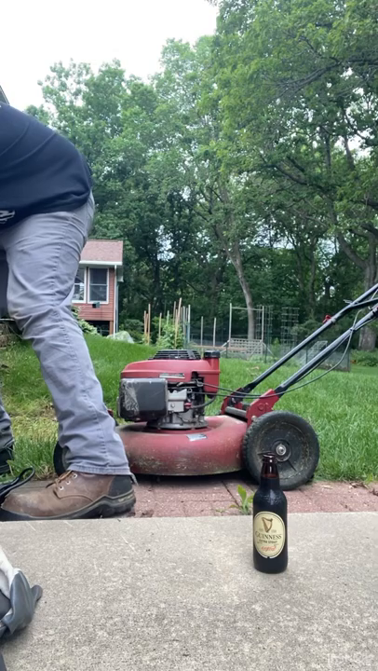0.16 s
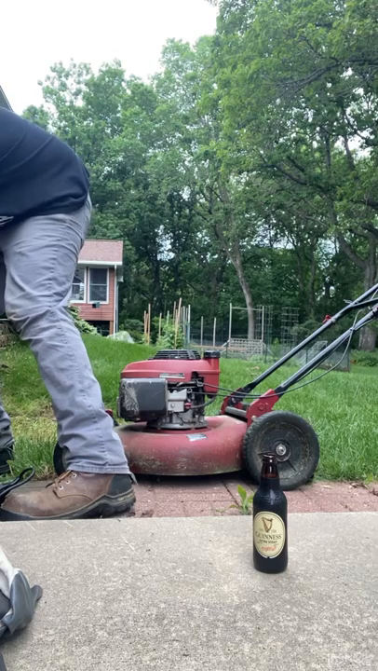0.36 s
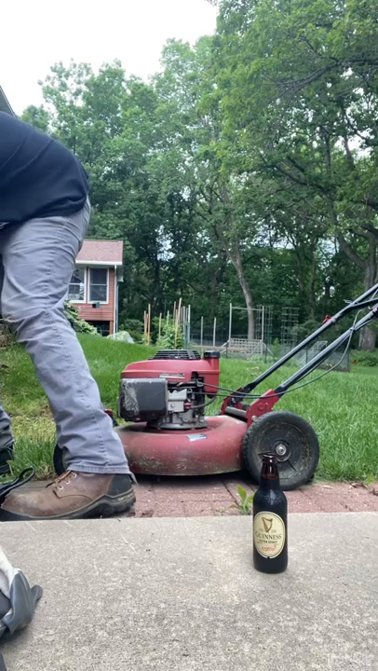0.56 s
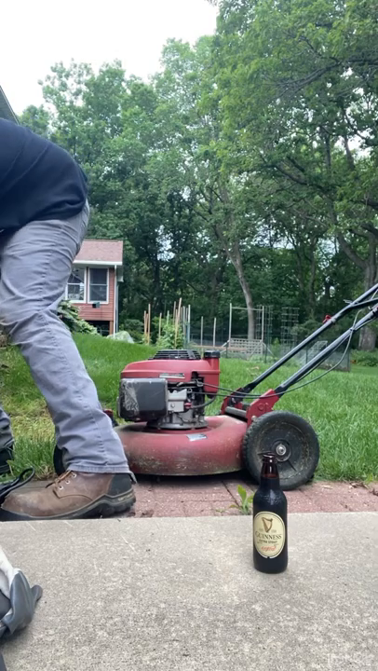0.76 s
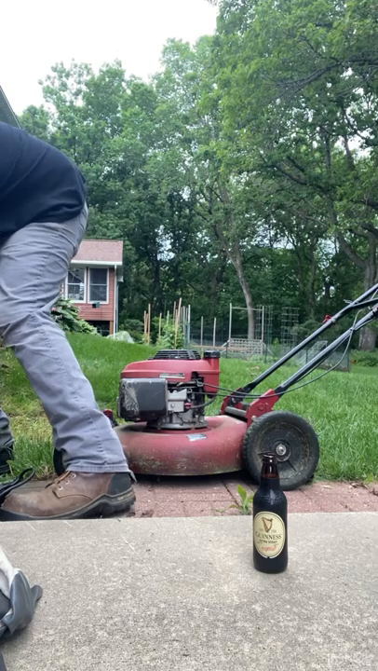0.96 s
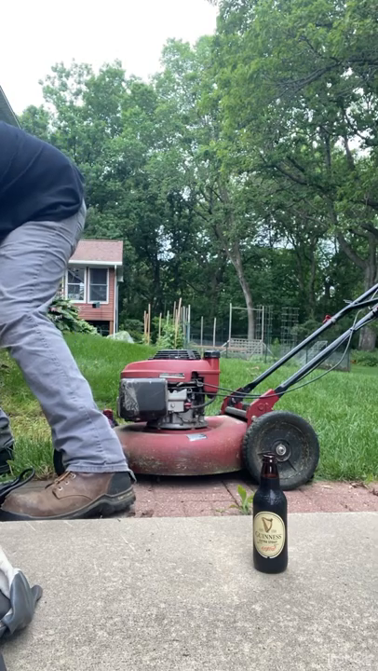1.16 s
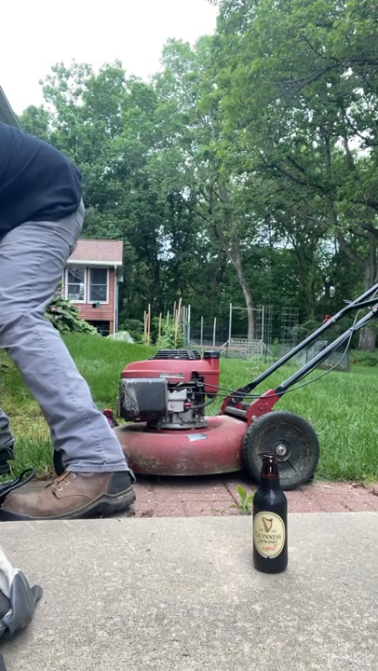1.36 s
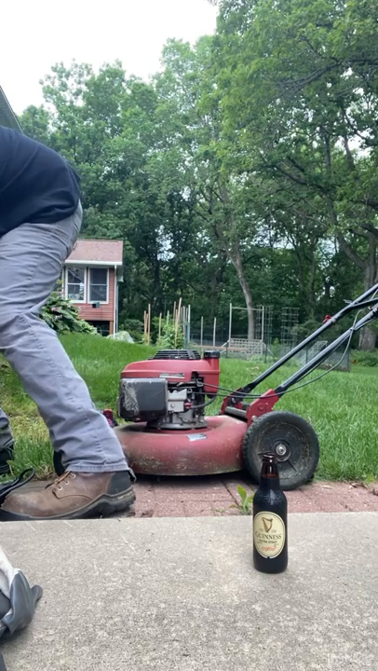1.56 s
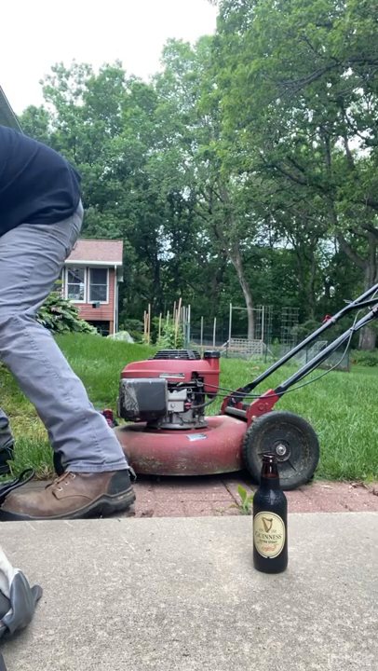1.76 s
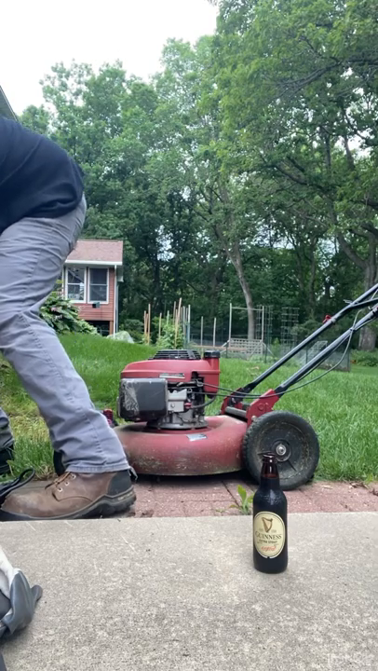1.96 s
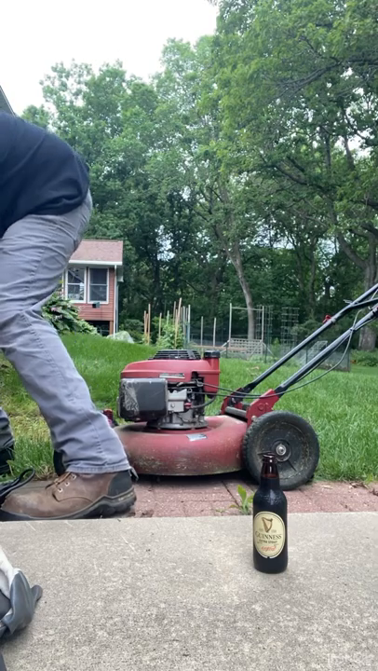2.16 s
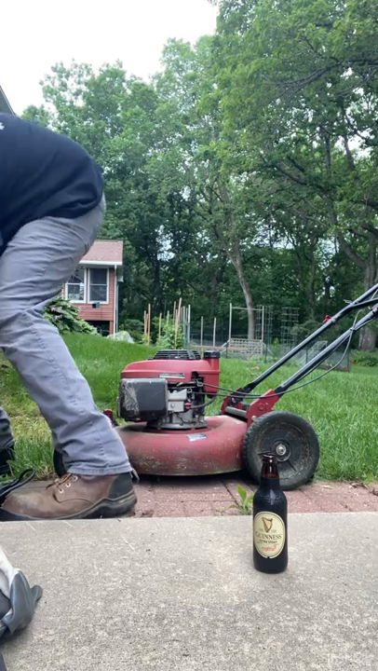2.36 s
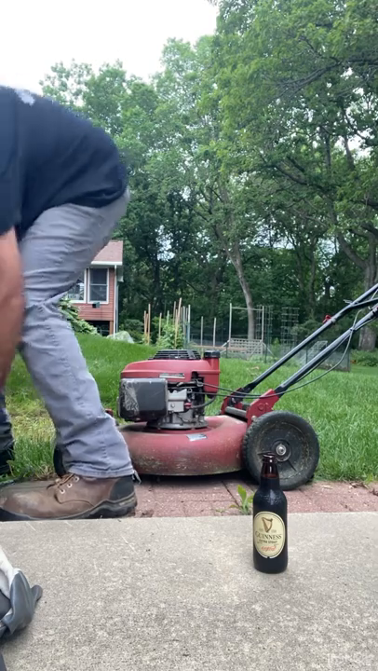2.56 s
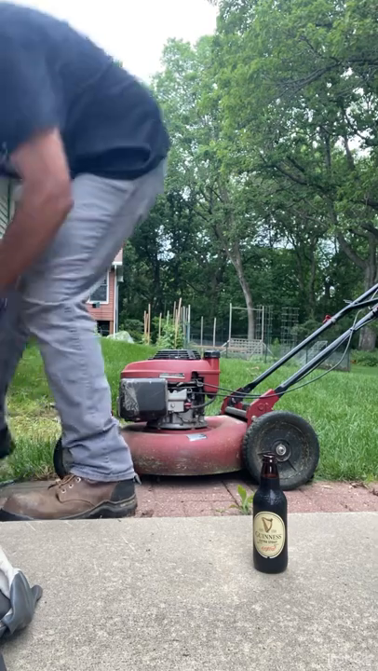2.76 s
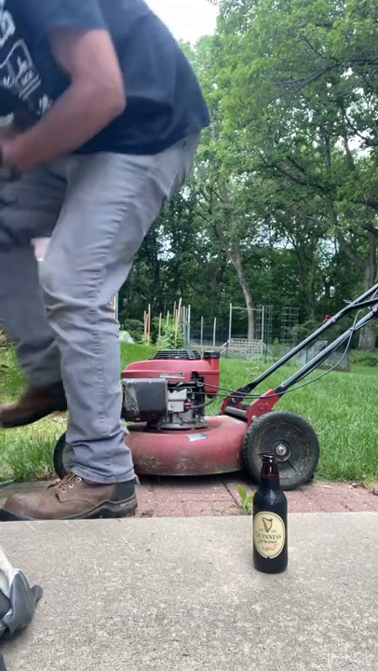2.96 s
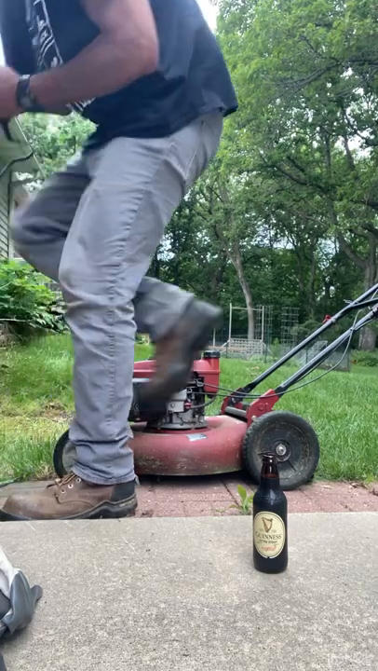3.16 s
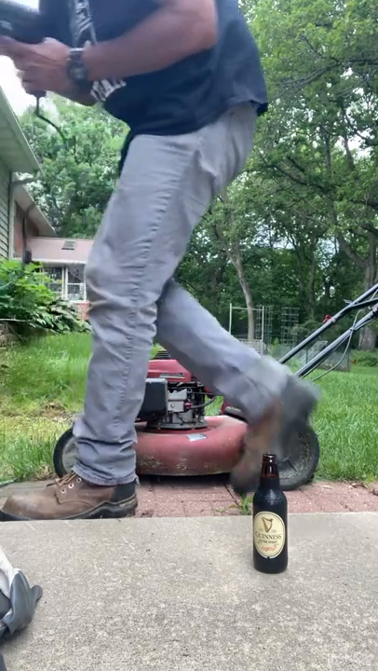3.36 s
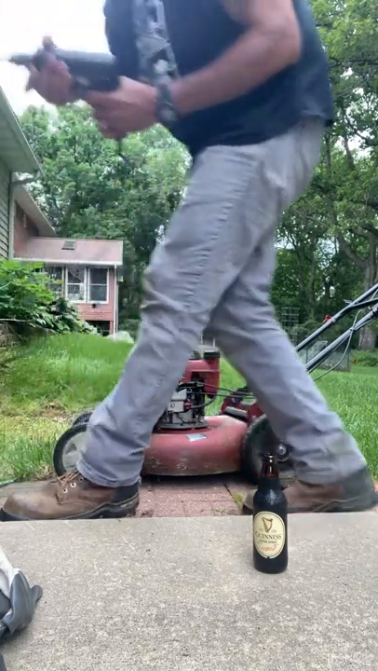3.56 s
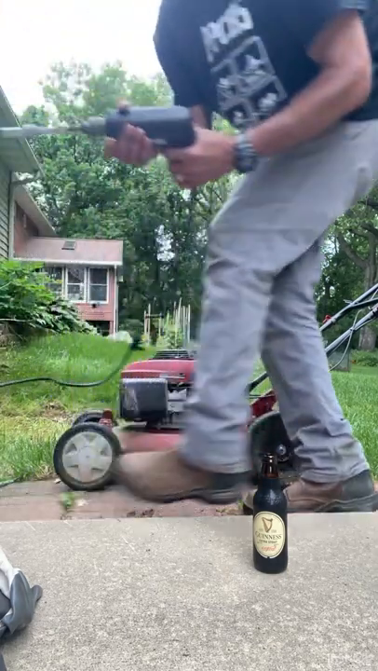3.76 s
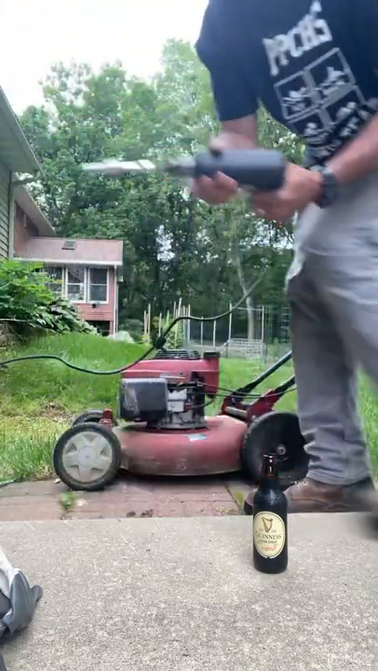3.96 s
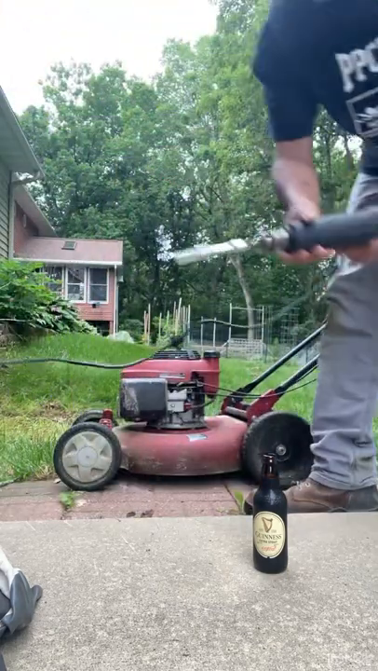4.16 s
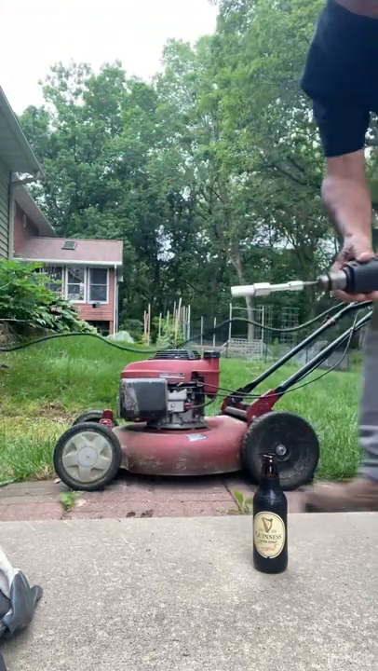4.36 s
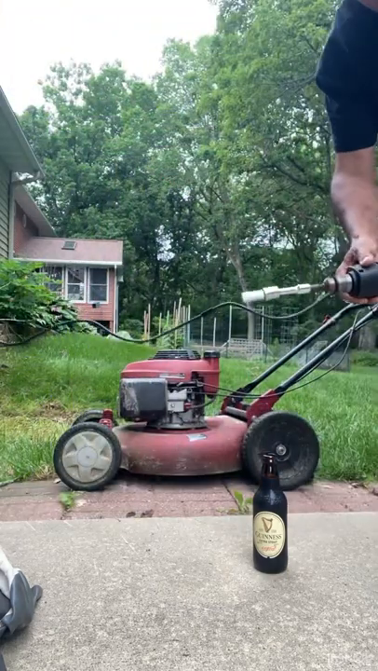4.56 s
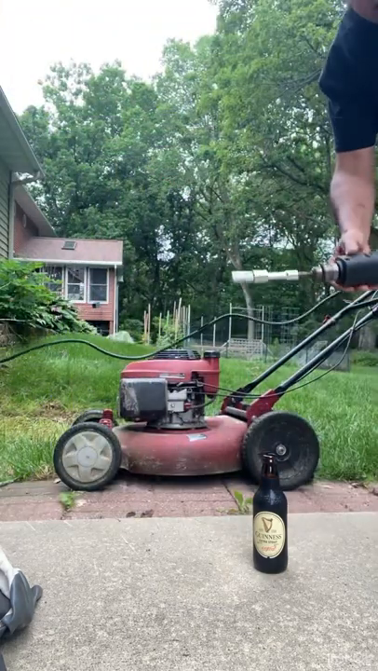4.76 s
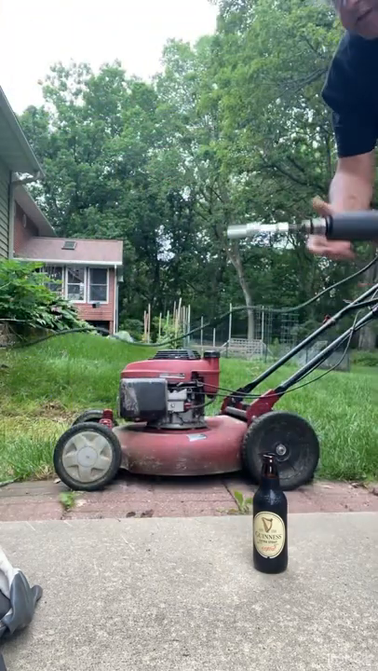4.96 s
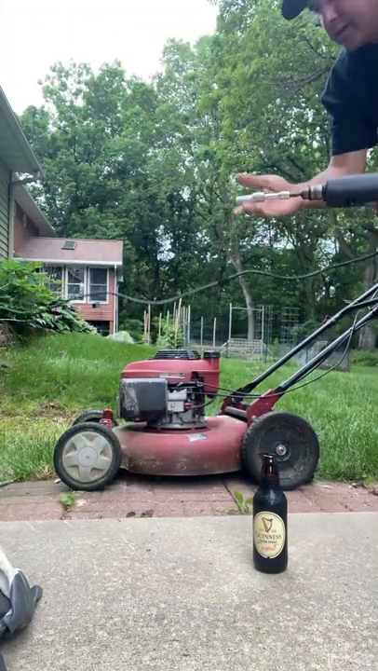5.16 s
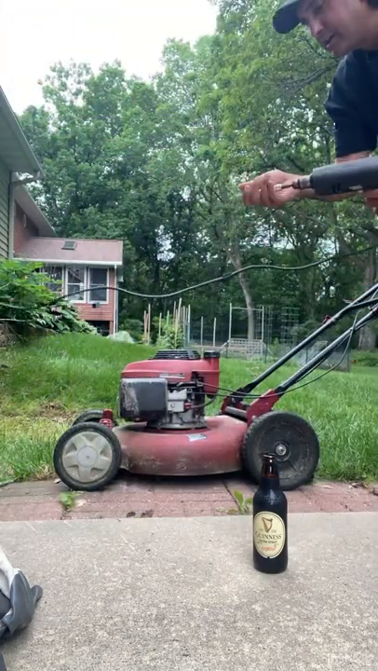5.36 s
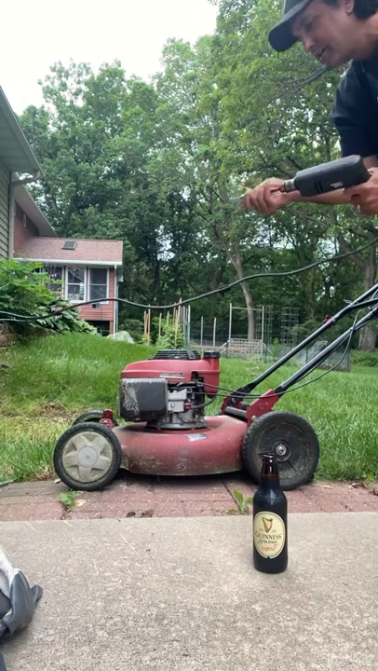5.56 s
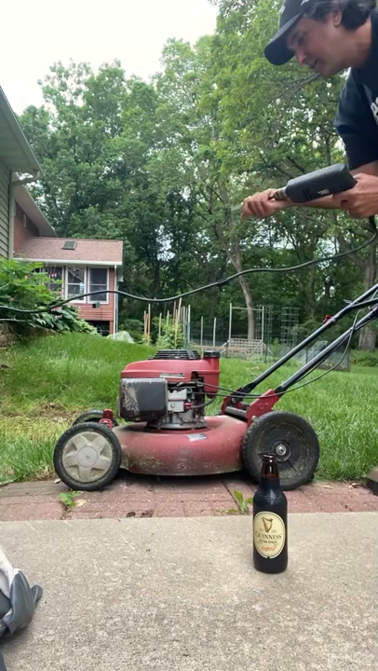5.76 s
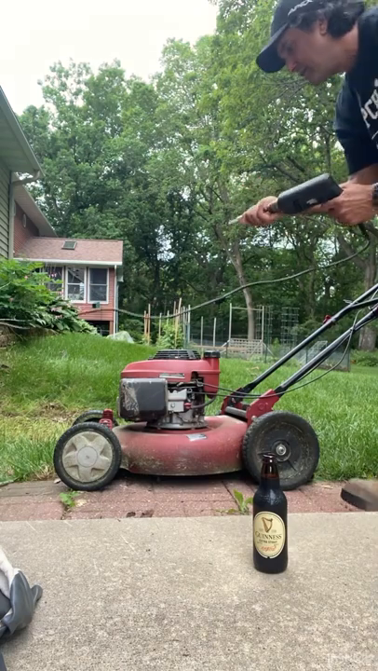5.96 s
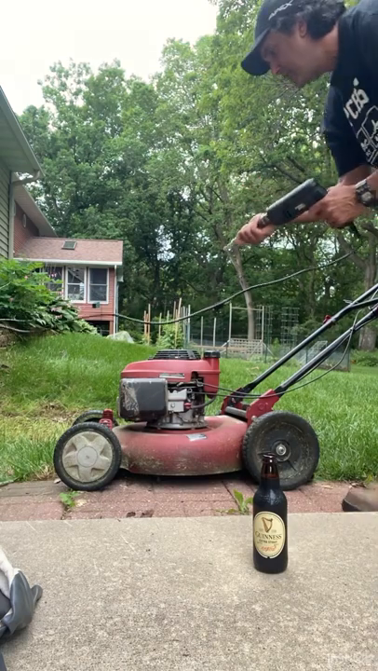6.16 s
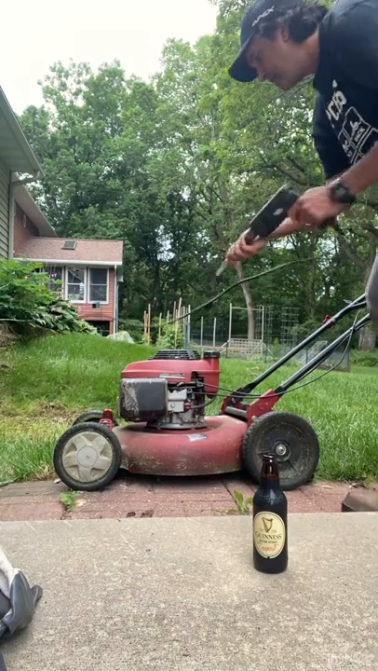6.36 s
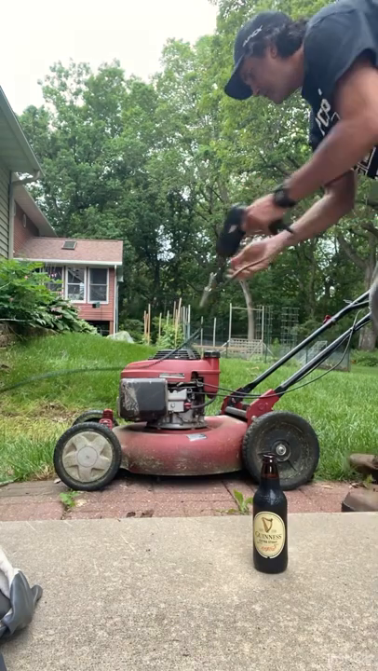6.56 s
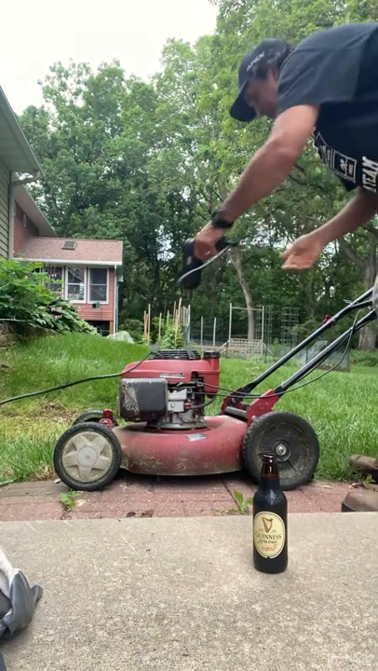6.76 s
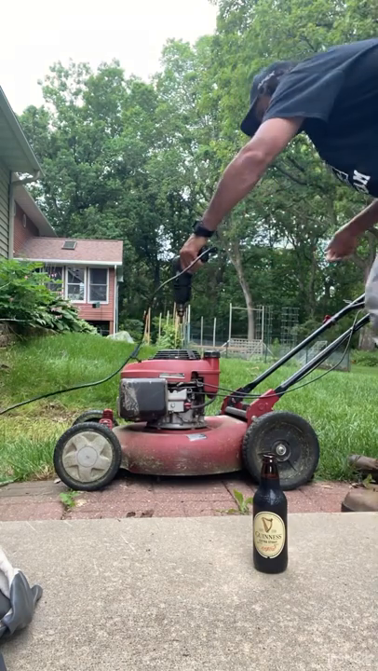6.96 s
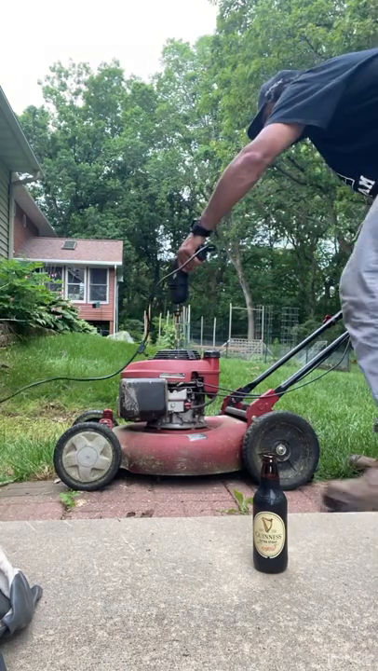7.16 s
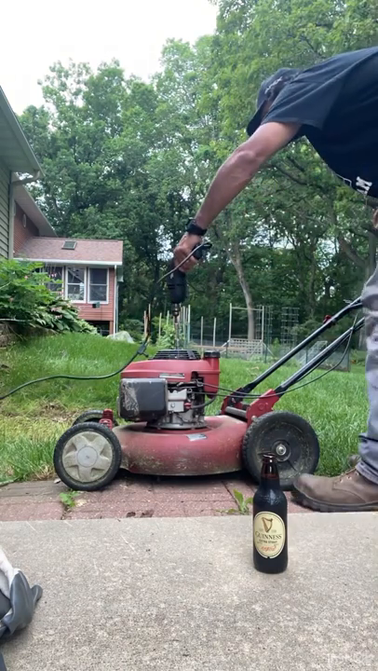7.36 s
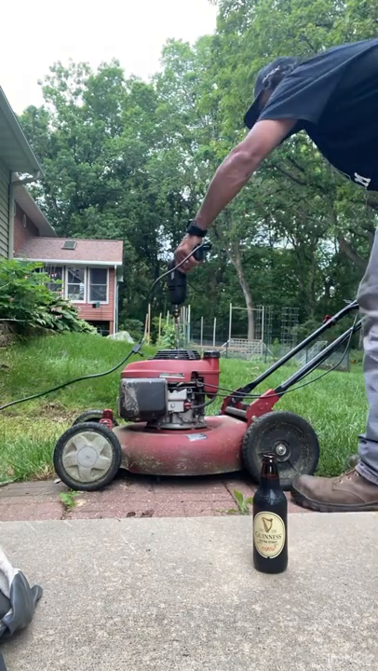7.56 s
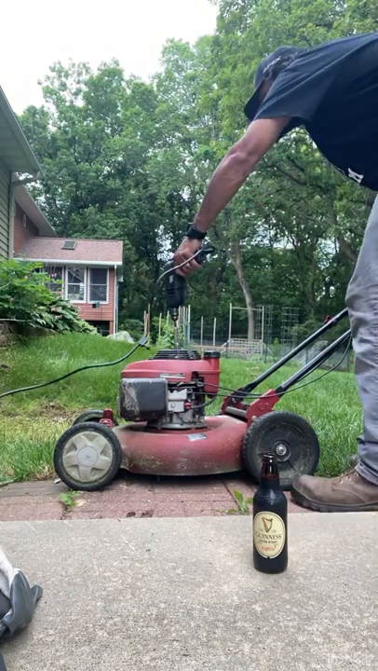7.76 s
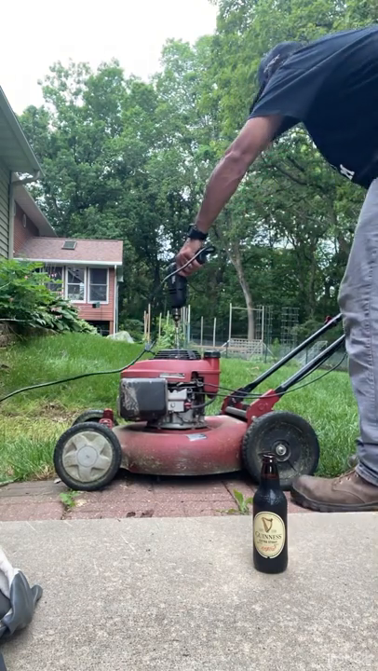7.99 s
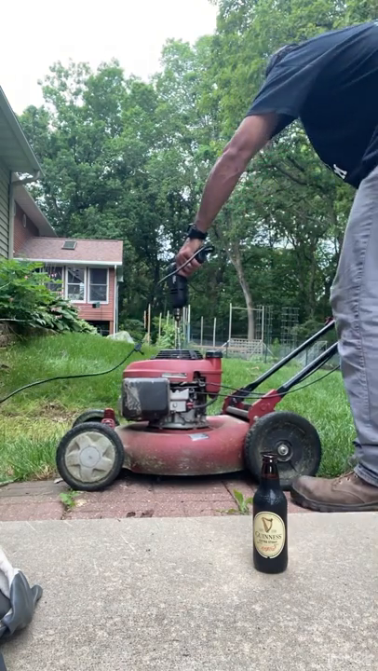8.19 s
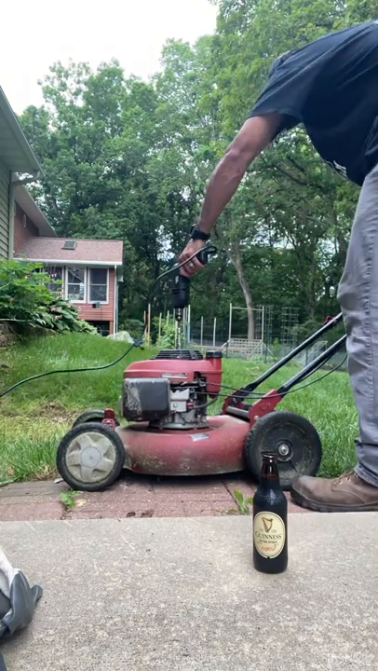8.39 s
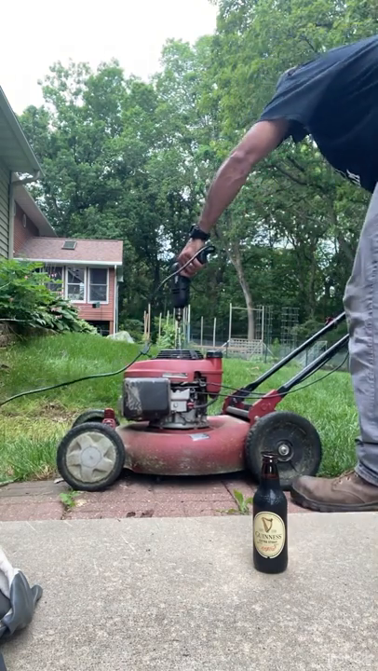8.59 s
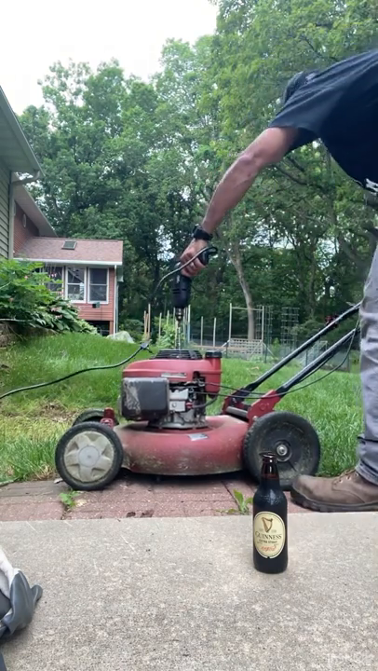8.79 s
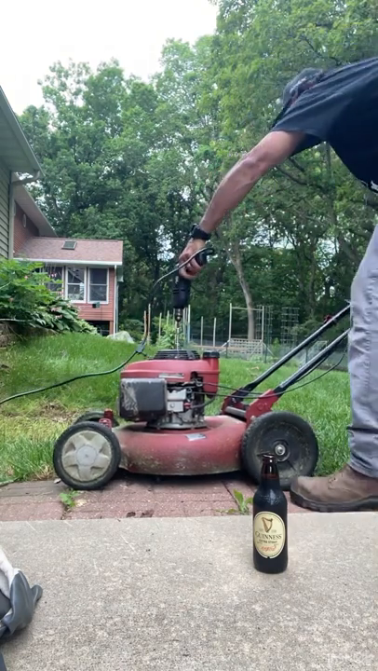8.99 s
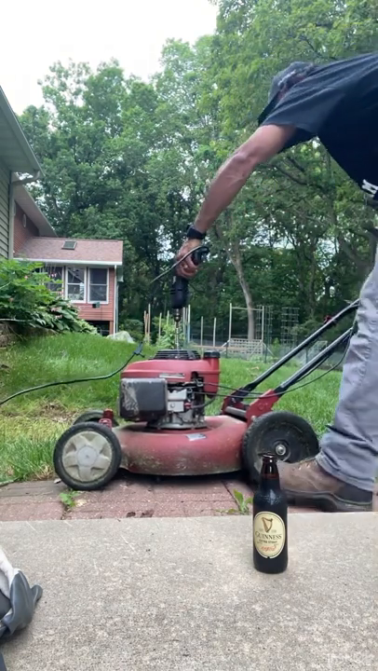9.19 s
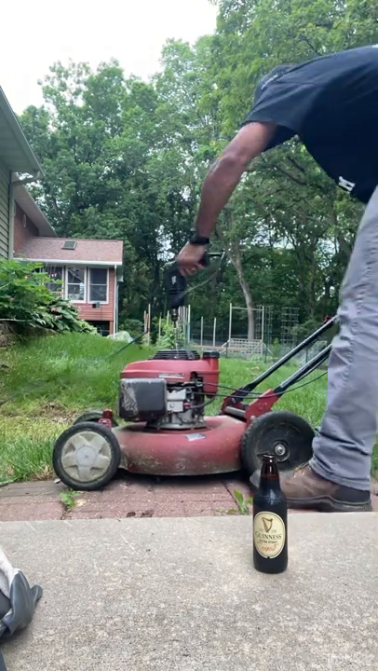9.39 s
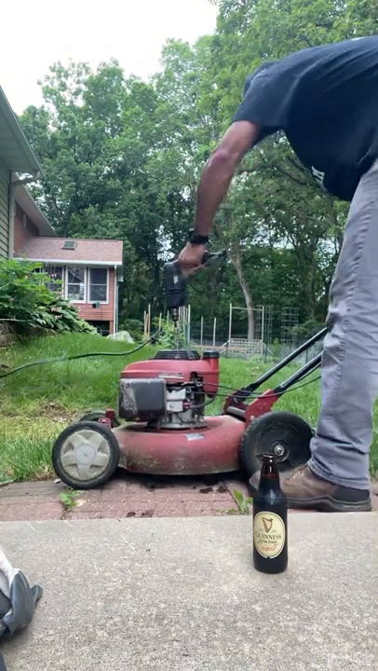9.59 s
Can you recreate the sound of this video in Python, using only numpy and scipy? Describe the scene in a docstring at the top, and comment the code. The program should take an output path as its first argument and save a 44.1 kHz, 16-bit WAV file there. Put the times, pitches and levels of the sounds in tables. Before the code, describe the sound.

A corded drill is blipped and whines down outdoors, its socket rattles onto a hollow engine cover, and a sudden gritty grind ends with sharp bangs.

```python
"""First come boots and small knocks in a back yard, with far bird whistles over suburban rumble and a hum.
A man then blips an electric drill five times: a rotor gives tones locked to its turns and shaped noise.
He steps over a lawn mower, fits the socket on the engine nut and starts to crank: struck modes, then
grinding grit. Whistles are gliding sines; rumble is filtered noise. Two microphone ports near the ground
hear the same air with a strong phase difference."""
import sys
import numpy as np
from scipy import signal
from scipy.fft import rfft, irfft
from scipy.io import wavfile
from scipy.ndimage import uniform_filter1d, map_coordinates

SR = 44100
rng = np.random.default_rng(int(sys.argv[2]) if len(sys.argv) > 2 else 0)


def write(x):
    x = np.atleast_2d(x).T
    wavfile.write(sys.argv[1], SR, np.round(np.clip(x, -1, 1) * 32767).astype(np.int16))


N = 424683

# Trigger pulls: press_s, release_s, top_speed_hz, slowing_per_s, noise_db, extra_bass_db,
# unbalance_tone_db, third_order_db, gear_mesh_db (references before the speed laws below)
TRIGGER_PULLS = [(2.465, 2.575, 333, 0.93, -41, 11, -54, -46, -70),
                 (3.915, 4.045, 375.5, 0.98, -34, 8, -43, -38.5, -60),
                 (4.42, 4.595, 410, 1.0, -34.5, 9.5, -39, -51, -37),
                 (5.389, 5.475, 420, 1.85, -40.5, 1, -58, -50, -74),
                 (5.94, 6.0, 312, 3.6, -45, 3, -75, -51, -57)]
# Brush and fan noise spectrum: frequency_hz, relative_level_db
WHIRR_SPECTRUM = [(150, -21.5), (300, -15), (470, -8), (650, -8.5), (880, -1), (1150, -10), (2000, -2.5),
                  (2700, -0.5), (3500, 2.5), (4700, -4), (6300, -5), (7500, -11.5), (10000, -19.5),
                  (12500, -24), (15500, -34)]
# Echo of the hand-held drill off the paving: start_s, delay_s, level_db
PAVING_ECHO = [(2.4, .0006, -14), (3.1, .0008, -17), (3.28, .00145, -11), (3.45, .0016, -11),
               (3.7, .0013, -11), (4.3, .0011, -19), (4.9, .001, -16), (5.25, .00115, -9),
               (5.45, .0013, -11), (5.65, .00122, -10), (6.1, .00104, -7)]
# Drill under load on the engine: start_s, level_db
CRANK_LEVEL = [(9.325, -66), (9.345, -33.5), (9.365, -14), (9.39, -22.5), (9.45, -16.5), (9.555, -15.5),
               (9.565, -68), (9.63, -32)]
# Gears grinding under load: frequency_hz, relative_level_db
GRIND_SPECTRUM = [(100, -20), (300, 0.5), (600, -12), (900, -0.5), (1200, -8), (1700, 2.5), (2600, -3.5),
                  (3500, 2.5), (4500, -5), (6100, 3.5), (7500, -15), (10000, -24.5), (12500, -35),
                  (15500, -48.5)]
# Mower deck rocking and engine turning over: start_s, level_db
ROLL_LEVEL = [(8.085, -64), (8.12, -43), (8.4, -45.5), (8.74, -39.5), (8.9, -34), (9.06, -42.5),
              (9.311, -44), (9.494, -34.5), (9.625, -32)]
# Rumble of the mower deck: frequency_hz, relative_level_db
DECK_SPECTRUM = [(30, -18), (70, 4), (110, 5), (240, 3.5), (400, -1), (600, -5), (900, -3.5), (1200, -15),
                 (3000, -19), (5000, -49.5)]
# Cord, clothes, soles and socket dragging: peak_s, level_db, length_s
SCRAPES = [(0.01, -51, 0.013), (0.203, -76.5, 0.9), (1.86, -77, 0.31), (2.434, -66.5, 0.22),
           (6.192, -67.5, 0.34), (6.55, -64, 0.071), (6.95, -67, 0.24), (7.159, -60, 0.029),
           (7.294, -62, 0.085), (7.489, -56.5, 0.039), (7.675, -57, 0.18), (8.025, -59.5, 0.048),
           (8.23, -54, 0.11), (8.607, -59, 0.41), (8.76, -33.5, 0.018), (8.795, -40, 0.039),
           (8.972, -45, 0.029), (9.082, -49.5, 0.13)]
# Fine grit of the scrapes: frequency_hz, relative_level_db
SCUFF_SPECTRUM = [(800, 3), (1700, 9), (2500, -6), (3600, -1.5), (6300, -2.5), (8500, -14), (12000, -20),
                  (15500, -48)]
# Small hard knocks: start_s, level_db, hollow_body_gain_db
KNOCKS = [(0.2234, -60, -11), (0.61, -66, -10), (0.949, -56.5, -6), (1.169, -57.5, -8), (1.55, -55.5, -2),
          (2.1476, -53, -16), (2.3224, -43.5, 2), (3.411, -60, -10), (3.913, -49, -18), (6.2767, -56, 16),
          (6.336, -51.5, -6), (6.628, -50.5, 10), (6.9297, -29, 18.5), (6.9845, -45, 12), (7.14, -41, 19),
          (7.276, -53, 22), (7.468, -38.5, 17.5), (7.5994, -42, 18), (7.6812, -43, 19.5),
          (7.767, -53.5, 24.5), (7.9432, -55.5, 0), (7.9899, -53, 17.5), (8.0107, -50, 13.5),
          (8.122, -50, -8), (8.192, -39, -4), (8.483, -56, 15), (8.5127, -43.5, -3), (8.535, -45, -9),
          (8.76, -26, 9.5), (8.787, -28, 10), (8.86, -34, -4), (8.895, -44, 28), (8.908, -42, 0),
          (8.931, -36.5, 4), (8.9779, -35, 24.5), (8.989, -40, 25), (9.061, -43, -4), (9.1116, -35.5, 12),
          (9.155, -40.5, -9), (9.217, -46, -6), (9.592, -3.5, -24), (9.6127, -4.5, -16), (9.6148, -12, -12)]
# First crack of a knock: frequency_hz, relative_level_db
CRACK_SPECTRUM = [(800, -6), (1700, 10.5), (2500, -2.5), (3600, 5), (5000, 3.5), (6500, 6), (9000, -11),
                  (12000, -21), (15500, -42)]
# Socket modes: frequency_hz, relative_level_db, t60_s
SOCKET_MODES = [(1810, -16, 0.07), (3350, 21, 0.0054)]
# Hollow engine cover modes: frequency_hz, relative_level_db, t60_s
COWL_MODES = [(300, -13, .04), (390, -12, .04), (520, -11, .035), (680, -10, .03), (800, -9, .03),
              (910, -8, .026)]
# Boots and dull bumps on the ground: start_s, level_db, pitch_hz
THUDS = [(0.191, -34.5, 395), (0.232, -37.5, 115), (0.228, -33, 450), (0.419, -30, 194), (0.954, -29, 148),
         (1.171, -33, 112), (1.333, -31.5, 132), (1.552, -21.5, 159), (1.583, -27, 137), (1.808, -38, 91.5),
         (1.826, -30, 355), (1.858, -34, 440), (1.867, -33.5, 94), (3.422, -23, 178), (3.561, -29, 152),
         (3.984, -19.5, 166), (4.479, -28.5, 153), (7.274, -25, 301), (7.319, -29, 214),
         (7.608, -28.5, 308), (8.447, -20.5, 300), (8.786, -33, 122), (8.862, -24.5, 245),
         (8.922, -27, 117), (9.158, -18, 181)]
# Ground modes: multiple_of_pitch, relative_level_db, t60_cycles_of_pitch
GROUND_MODES = [(0.5, -8, 12), (1, 2.5, 9.2), (1.6, -1.5, 7.2), (2.69, -7, 4)]
# Two falling whistles of each phrase, points of each: time_in_phrase_s, pitch_hz, relative_level_db
BIRD_SLURS = [
    [(0, 4100, 2), (.02, 3650, 7), (.05, 3400, 8), (.17, 3340, -10)],
    [(.1, 2400, 0), (.13, 2130, 6), (.18, 1900, 8), (.24, 1700, 2)],
]
# Yard rumble: frequency_hz, relative_level_db
YARD_SPECTRUM = [(30, -13), (60, 4), (120, 2), (250, -9), (450, -14.5), (850, -14.5), (1150, -28.5),
                 (1700, -24.5), (2500, -38), (3600, -36.5), (5500, -78), (8000, -64), (12000, -55),
                 (15500, -57)]
# Hum: frequency_hz, level_db (before its waver), start_s, end_s
HUMS = [(243.4, -63, 0, 13)]
# Port pair: frequency_hz, left_over_right_db, left_phase_lead_rad, likeness_0_to_1
PORTS = [(60, -5, -.1, .93), (200, -12, -.7, .82), (350, -7, -2.2, .9), (550, -1, -2.85, .94),
         (700, -2, -2.7, .92), (940, 3, -1.7, .88), (1080, 2, -3.1, .75), (1180, .5, -3.3, .88),
         (1700, -1, -4.7, .6), (1900, -2, -3.8, .3), (2150, 3, -2.8, .65), (2450, 2, -3.2, .9),
         (2750, .5, -3.25, .985), (3050, .5, -3.3, .96), (3250, 1, -3.9, .8), (3500, 1, -4.6, .65),
         (4000, .5, -5.8, .72), (4600, 2, -7, .4), (5300, 2.5, -6.6, .72), (6200, .8, -6.45, .95),
         (7400, .2, -6.5, .92), (9000, .5, -7.4, .7), (10500, 0, -8.2, .55), (12000, 0, -3 * np.pi, .97),
         (12600, 0, -3 * np.pi, 1)]

MESH_ORDER, MESH_FADE_DB_PER_S = 9, 110  # mesh tone in cycles per turn, fading from the press
NOISE_RISE_S = .016
# level change per octave of speed: noise running down, its low part, unbalance tone, noise climbing
NOISE_DB, LOW_DB, UNBALANCE_DB, CLIMB_DB = 8, 4, 21.5, 2.5
# the third order is loudest at this pitch; loss one octave away, and largest loss
HOUSING_HZ, HOUSING_DB, HOUSING_MOST_DB = 850, 58, 15
WAVER_DB = 3.5  # random swell of the third order
# a hand brakes the spinning socket: noise gained, level of mesh tone added
GRIP_S, GRIP_WIDTH_S, GRIP_DB, GRIP_MESH_DB = 5.54, .03, 2, -37
STOP_S, STOP_DB_PER_S = 6.075, 236  # the hand closes on it
# while running down under this speed the gears run loose, by at most so many octaves
LOOSE_HZ, LOOSEST_OCTAVES = 260, .5
# per octave of looseness: random flutter, added level, depth of the chatter bursts
RATTLE_DB, RATTLE_LIFT_DB, CHATTER_DB = 2.5, 3, 7
CHATTER_PER_TURN = .43
SCRAPE_RISE, SCRAPE_FADE_DB = .48, 16.5  # rise time as a share of the length; loss over the length
BIRD_S, PHRASE_S, PHRASES, BIRD_DB = .213, .429, 5, -82.5
YARD_DB = -55
EDGE_HZ = 15800  # upper band limit
HOP, SIZE = 128, 512  # short-time spectrum, in samples


def amp(db):
    """Decibel law: 20 dB is a factor of ten in amplitude."""
    return 10 ** (np.asarray(db) / 20)


def evened(x):
    """Normalisation to unit rms."""
    return x / np.sqrt(np.mean(x ** 2) + 1e-20)


def white(n=N):
    """White noise: every sample independent."""
    return rng.standard_normal(n)


def slow_noise(span, n=N):
    """Slow random motion: a moving average removes the rapid part of white noise; rms 1."""
    return evened(uniform_filter1d(white(n), span))


def read(points, hz, column=1):
    """Interpolation of a table column along a logarithmic frequency axis."""
    table = np.array(points)
    return np.interp(np.log(hz + 1), np.log(table[:, 0] + 1), table[:, column])


def play(rows, fade=.013):
    """Interpolation in time: columns at every sample, and a gate open while the table lasts."""
    s, *columns = np.transpose(rows)
    t = np.arange(N) / SR
    gate = np.clip(np.minimum(t - s[0], s[-1] - t) / fade, 0, 1)
    return [np.interp(t, s, c) for c in columns], gate


def colour(x, spectrum):
    """Linear filtering: each frequency is weighted by the spectrum, then rms set to 1."""
    hz = np.fft.rfftfreq(N + 1, 1 / SR)
    weighted = rfft(x, N + 1) * amp(read(spectrum, hz))
    return evened(irfft(weighted, N + 1)[:N])


def patches(bins, frames):
    """Random field over frequency and time, correlated over so many bins and frames."""
    field = rng.standard_normal((N // HOP + 3, SIZE // 2 + 1)).T
    across_bands = uniform_filter1d(field, bins, 0)
    return evened(uniform_filter1d(across_bands, frames, 1))


def patchy(x, patchy_db):
    """Non-stationary noise: bands swell and sink apart from each other."""
    z = signal.stft(x, nperseg=SIZE, noverlap=SIZE - HOP)[2]
    z = z * amp(patchy_db * patches(bins=6, frames=24)[:, :z.shape[1]])
    return evened(signal.istft(z, nperseg=SIZE, noverlap=SIZE - HOP)[1][:N])


def grit(per_s, spread_db, smooth):
    """Impulsive friction: random clicks of uneven size over a share of smooth noise."""
    size = amp(spread_db * np.minimum(rng.exponential(1, N), 3))
    struck = rng.random(N) < per_s / SR
    return evened(size * struck * white()) + smooth * white()


def add(mix, s, sound):
    """Superposition of a sound that starts at time s."""
    part = mix[round(s * SR):][:len(sound)]
    part += sound[:len(part)]


def ring(modes, t):
    """Modal decay: one blow excites every mode, slightly detuned and with its own strength."""
    draw = rng.standard_normal((len(modes), 3)) * [2.5, .03, 2]  # strength dB, detuning, phase rad
    return sum(amp(db + extra_db - 60 * t / t60) * np.sin(2 * np.pi * hz * (1 + detune) * t + phase)
               for (hz, db, t60), (extra_db, detune, phase) in zip(modes, draw))


def armature(t):
    """Rotor dynamics: speed climbs as a root of time, then decays exponentially; also the latest pull."""
    speed, pull = np.full(N, 100.), np.zeros(N, int)
    for k, (press, release, top_hz, slowing, *_) in enumerate(TRIGGER_PULLS):
        start = speed[round(press * SR)]
        climb = start + (top_hz - start) * np.sqrt(np.interp(t, [press, release], [0, 1]))
        coasting = np.exp(-slowing * np.maximum(t - release, 0))
        speed = np.where(t < press, speed, climb * coasting)
        pull[t >= press] = k
    return speed, np.array(TRIGGER_PULLS)[pull].T


def drill():
    """Rotating source: tones at multiples of the turning rate, and noise throbbing once a turn."""
    t, rise = np.arange(N) / SR, round(NOISE_RISE_S * SR)
    speed, (press, release, top_hz, _, noise_db, low_db, one_db, three_db, mesh_db) = armature(t)
    octaves, coasting = np.log2(speed / top_hz), t > release
    loose = np.clip(np.log2(LOOSE_HZ / speed), 0, LOOSEST_OCTAVES) * coasting
    grip = 1 / (1 + ((t - GRIP_S) / GRIP_WIDTH_S) ** 2)
    turns = np.cumsum(speed * (1 + .006 * slow_noise(500))) / SR
    waver = evened(uniform_filter1d(slow_noise(1500), 1500))

    # tones of the armature and the gears
    one_db = one_db + UNBALANCE_DB * octaves
    housing_loss_db = np.minimum(HOUSING_DB * np.log2(3 * speed / HOUSING_HZ) ** 2, HOUSING_MOST_DB)
    three_db = three_db + WAVER_DB * (waver - .5) - housing_loss_db
    mesh = amp(mesh_db - MESH_FADE_DB_PER_S * (t - press)) + amp(GRIP_MESH_DB) * grip
    orders = [(1, amp(one_db)), (2, amp(one_db - 9)), (3, amp(three_db)), (6, amp(three_db - 9)),
              (12, amp(three_db - 12)), (MESH_ORDER, mesh)]
    tones = sum(uniform_filter1d(gain, rise) * np.sin(2 * np.pi * k * turns) for k, gain in orders)

    # brush and fan noise, split into a low part and the rest
    throb = 1 + .19 * np.cos(2 * np.pi * turns)
    noise = patchy(colour(grit(4000, spread_db=2, smooth=1.45) * throb, WHIRR_SPECTRUM), patchy_db=1.5)
    low = signal.sosfilt(signal.butter(2, 1500, fs=SR, output="sos"), noise)
    slope_db = np.where(coasting, NOISE_DB, CLIMB_DB)
    level_db = noise_db + slope_db * octaves + GRIP_DB * grip + RATTLE_LIFT_DB * loose
    level = uniform_filter1d(amp(level_db), rise)

    # loose gears make the noise flutter, more when slow, and slack teeth slap in bursts
    slap = np.cos(2 * np.pi * CHATTER_PER_TURN * turns + 1.13 * waver)
    flutter = amp((1.3 + RATTLE_DB * loose) * slow_noise(700) + CHATTER_DB * loose * slap)
    low_gain = amp(low_db + LOW_DB * octaves * coasting)
    whirr = level * (flutter * (noise - low) + np.sqrt(flutter) * low_gain * low)

    started = np.clip((t - TRIGGER_PULLS[0][0]) / NOISE_RISE_S, 0, 1) ** 2
    stopped = amp(-STOP_DB_PER_S * np.maximum(t - STOP_S, 0))
    return started * stopped * (whirr + tones)


def bounced(x):
    """Comb interference: adds the echo off the paving, its delay following the height of the drill."""
    at, (s, delay, db) = np.arange(N), np.transpose(PAVING_ECHO)
    delay_now = np.interp(at / SR, s, delay)
    late = map_coordinates(x, [at - SR * delay_now], order=1)  # linear interpolation dulls the treble of the echo
    return x + amp(np.interp(at / SR, s, db)) * late


def cranking():
    """Friction under load: gears grind as dense grit while the deck rumbles as it rocks."""
    (grind_db,), loaded = play(CRANK_LEVEL)
    (roll_db,), rocking = play(ROLL_LEVEL)
    grind = patchy(colour(grit(5000, spread_db=2, smooth=1.5), GRIND_SPECTRUM), patchy_db=2)
    rumble = patchy(colour(grit(900, spread_db=2, smooth=1.1), DECK_SPECTRUM), patchy_db=1)
    return loaded * amp(grind_db) * grind + rocking * amp(roll_db) * rumble


def scrapes():
    """Sliding friction: fine grit whose level rises and falls linearly in decibels."""
    scuff = patchy(colour(grit(1500, spread_db=3.5, smooth=.54), SCUFF_SPECTRUM), patchy_db=2)
    now = np.arange(N) / SR
    return scuff * sum(amp(db - SCRAPE_FADE_DB * np.maximum(now - s, (s - now) / SCRAPE_RISE) / length)
                       for s, db, length in SCRAPES)


def knocks():
    """Hard impact: a dry crack and short rattle, with ringing metal and a slower hollow body."""
    out, t = np.zeros(N), np.arange(8000) / SR
    rattle = patchy(colour(grit(2500, spread_db=2, smooth=1.2), CRACK_SPECTRUM), patchy_db=4)
    decay = np.exp(-t / .0052) + .15 * np.exp(-t / .024)
    for s, db, body_db in KNOCKS:
        crack = np.roll(rattle, -round(s * SR))[:len(t)] * decay
        metal = .1 * ring(SOCKET_MODES, t)
        body = amp(body_db) * ring(COWL_MODES, t) * (1 - np.exp(-t / .003)) ** 2
        blow = metal + .53 * crack + body
        add(out, s, amp(db) * blow * (1 - np.exp(-t / .00029)))
    return out


def thuds():
    """Soft impact: a slow onset excites low, heavily damped ground modes with a puff of grit."""
    out, t = np.zeros(N), np.arange(8000) / SR
    puff = signal.sosfilt(signal.butter(4, [150, 600], "bandpass", fs=SR, output="sos"), white())
    for s, db, hz in THUDS:
        modes = [(k * hz, mode_db, cycles / hz) for k, mode_db, cycles in GROUND_MODES]
        crunch = .69 * np.roll(puff, -round(s * SR))[:len(t)] * np.exp(-t / .015)
        add(out, s, amp(db) * (ring(modes, t) + crunch) * (1 - np.exp(-t / .0065)))
    return out


def bird():
    """Frequency modulation: gliding sines made slightly hoarse by jitter, in evenly spaced phrases."""
    out = np.zeros(N)
    for s in BIRD_S + PHRASE_S * np.arange(PHRASES):
        for slur in BIRD_SLURS:
            at, hz, db = np.transpose(slur)
            t = np.arange(at[0], at[-1], 1 / SR)
            hoarse = 1 + .012 * slow_noise(150, len(t))
            phase = 2 * np.pi * np.cumsum(np.interp(t, at, hz) * hoarse) / SR
            tone = np.sin(phase) * amp(np.interp(t, at, db) + BIRD_DB)
            add(out, s + at[0], tone * signal.windows.tukey(len(t), .08))
    return out


def walls(x, t60):
    """Reverberation: convolution with sparse, decaying echoes from house and paving."""
    t = np.arange(.004, .4, 20 / SR)
    taps = np.zeros(SR // 2)
    places = (t * SR).astype(int) + rng.integers(0, 20, len(t))
    taps[places] = rng.choice([-1., 1.], len(t)) * amp(-60 * t / t60)
    return signal.fftconvolve(x, taps / np.linalg.norm(taps))[:N]


def yard():
    """Ambient field: filtered noise for distant rumble, and a sine hum with a wavering level."""
    out = amp(YARD_DB) * patchy(colour(white(), YARD_SPECTRUM), patchy_db=1.0)
    for hz, db, start, end in HUMS:
        level = amp(db + 2 * slow_noise(6000))
        gate = play([(start, 0), (end, 0)], fade=.11)[1]
        out += level * gate * np.sin(2 * np.pi * hz * np.arange(N) / SR)
    return out


def scene():
    """Superposition: direct sounds, their echoes and the yard; the same air reaches both ports."""
    near = bounced(drill()) + cranking() + scrapes() + knocks() + thuds()
    far = bird()
    far = far + amp(1) * walls(far, t60=.35)  # echoes 1 dB over the direct whistle
    air = near + amp(-17) * walls(near, t60=.22) + far + yard()
    return np.array([air, air])


def record(dry):
    """Partial coherence: the left port differs in level and phase by band, with a shifting scattered share."""
    hz, _, z = signal.stft(dry[0], SR, nperseg=SIZE, noverlap=SIZE - HOP)
    scatter = patches(bins=2, frames=50) + 1j * patches(bins=2, frames=50)
    scatter = scatter[:, :z.shape[1]] / np.sqrt(2)
    same = np.clip(read(PORTS, hz, column=3), 0, 1)[:, None]
    phase = np.exp(1j * read(PORTS, hz, column=2))[:, None]
    port = same * phase + np.sqrt(1 - same ** 2) * scatter
    gain = amp(read(PORTS, hz))[:, None]
    left = signal.istft(z * gain * port, nperseg=SIZE, noverlap=SIZE - HOP)[1][:N]
    # bass roll-off, overload, band limit
    pair = signal.sosfilt(signal.butter(4, 36, "highpass", fs=SR, output="sos"), [left, dry[1]])
    pair = np.clip(pair, -.95, .95)
    lowpass = signal.firwin(511, EDGE_HZ, window=("kaiser", 9), fs=SR)
    return signal.oaconvolve(pair, lowpass[None], "same")


dry = scene()
out = record(dry)
write(out)
```